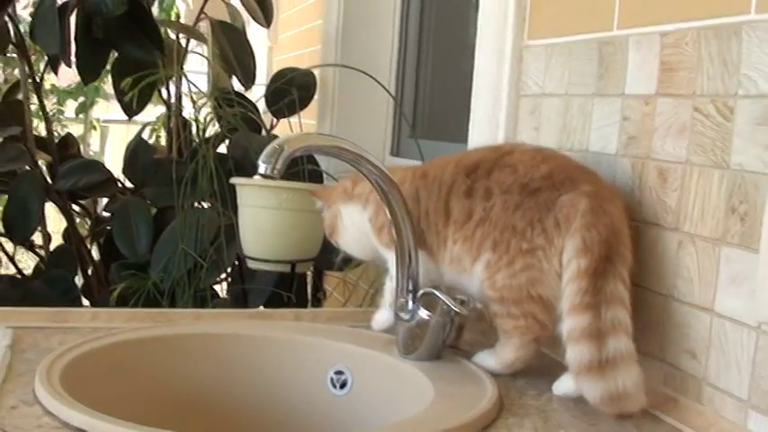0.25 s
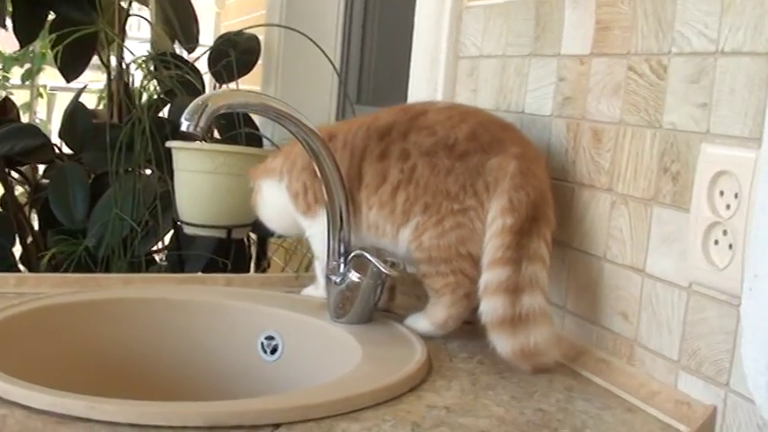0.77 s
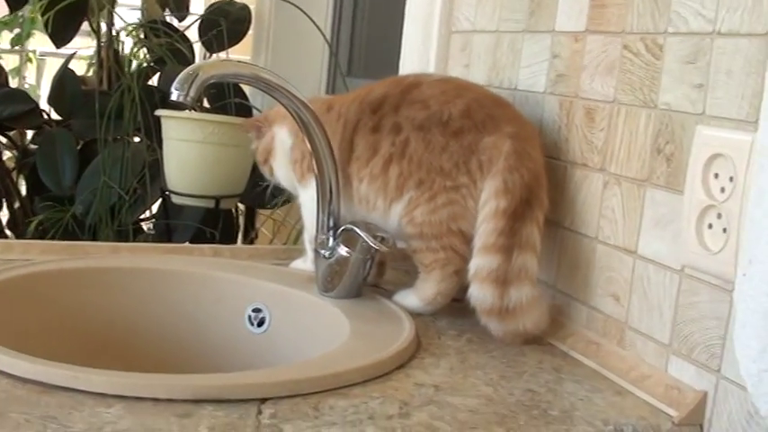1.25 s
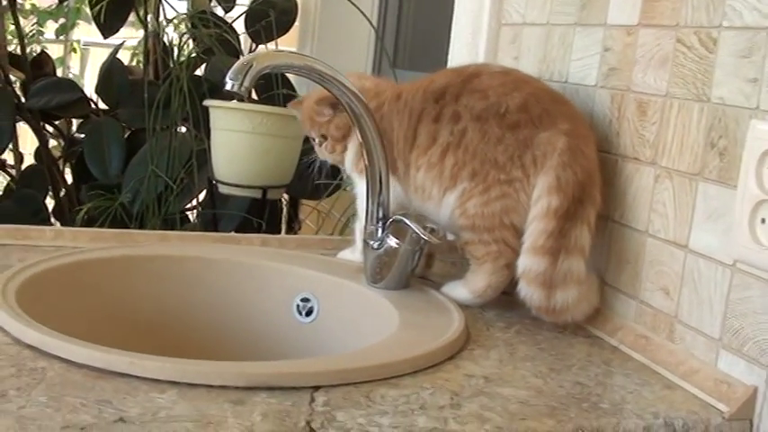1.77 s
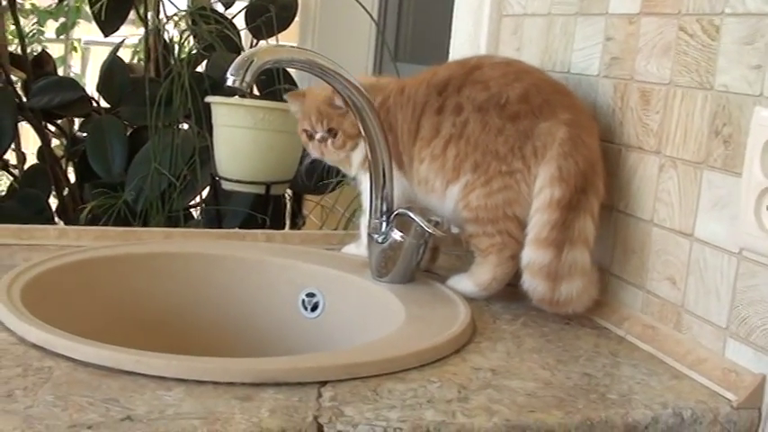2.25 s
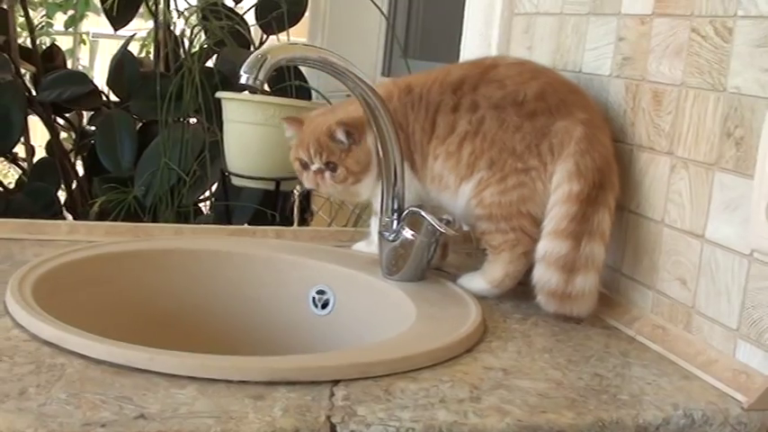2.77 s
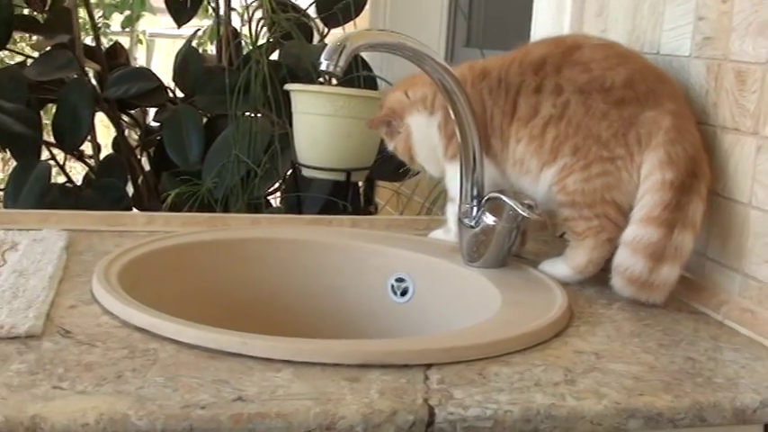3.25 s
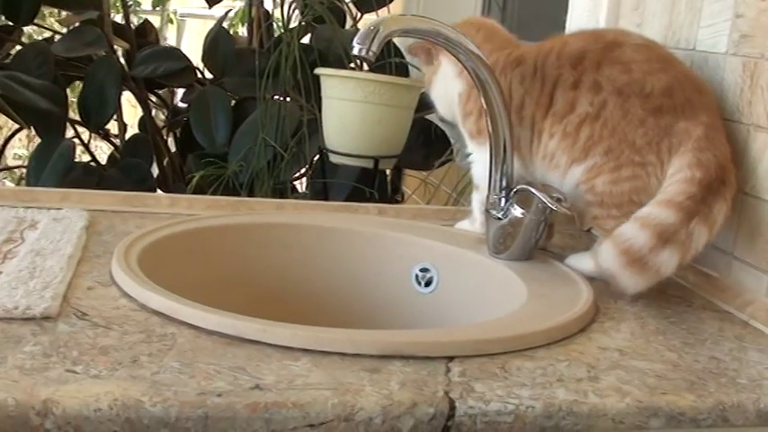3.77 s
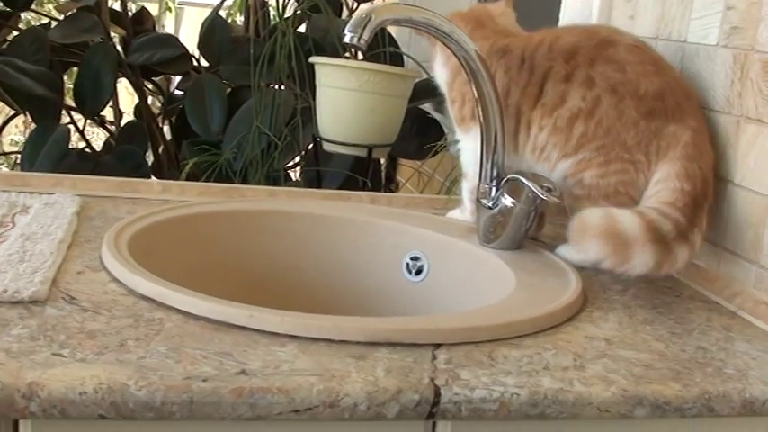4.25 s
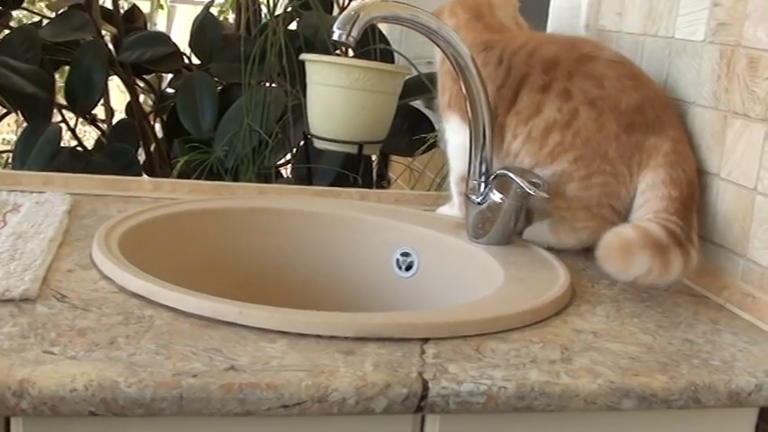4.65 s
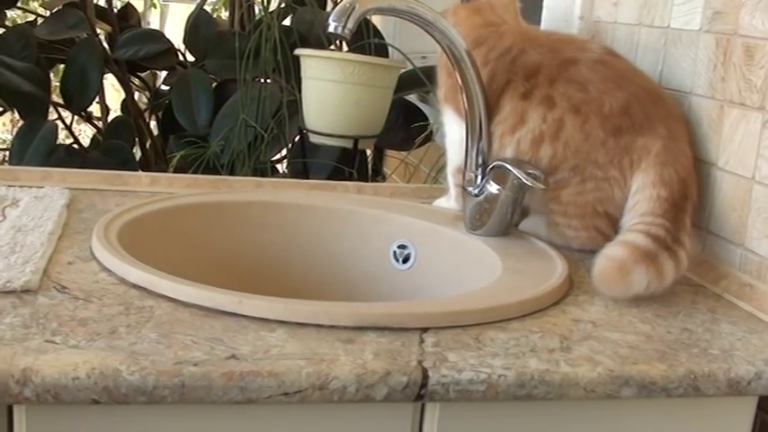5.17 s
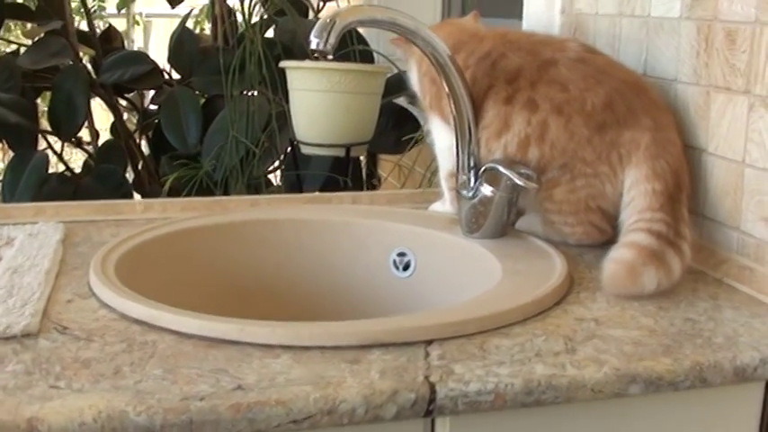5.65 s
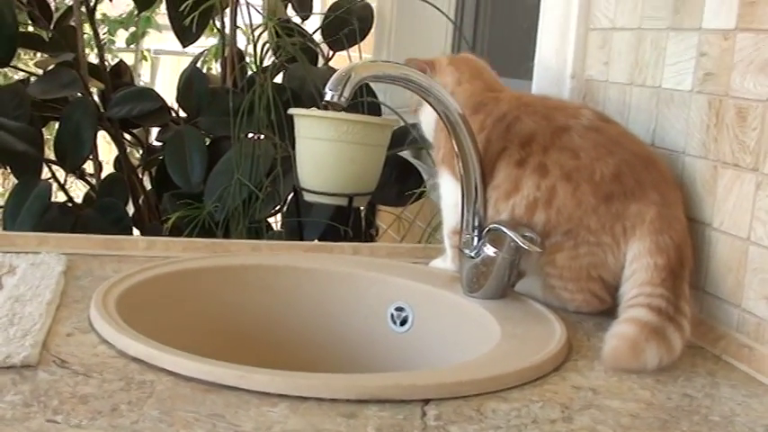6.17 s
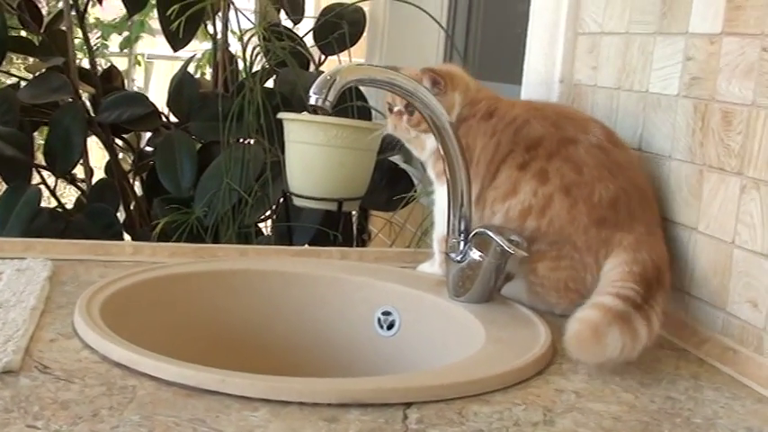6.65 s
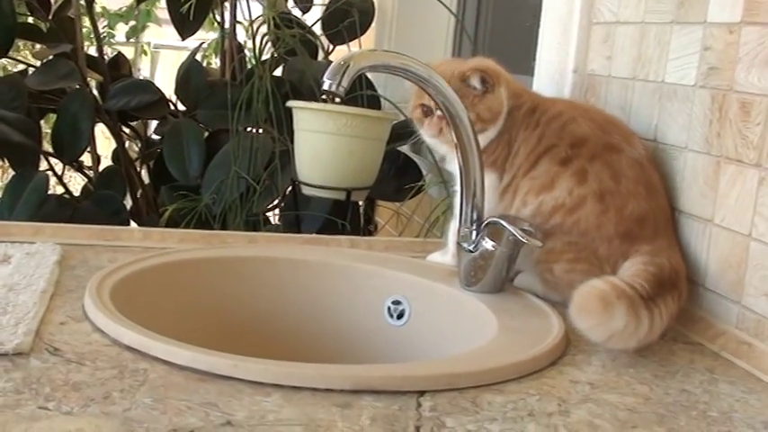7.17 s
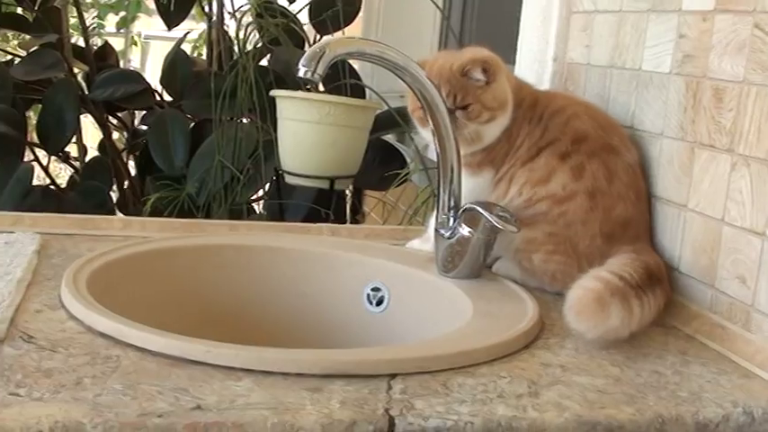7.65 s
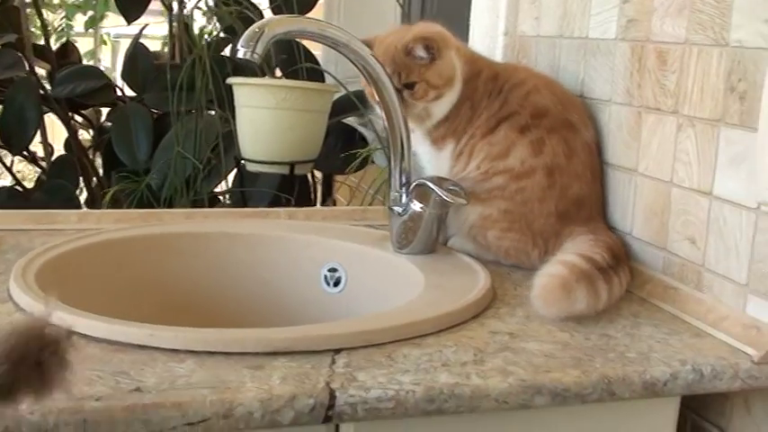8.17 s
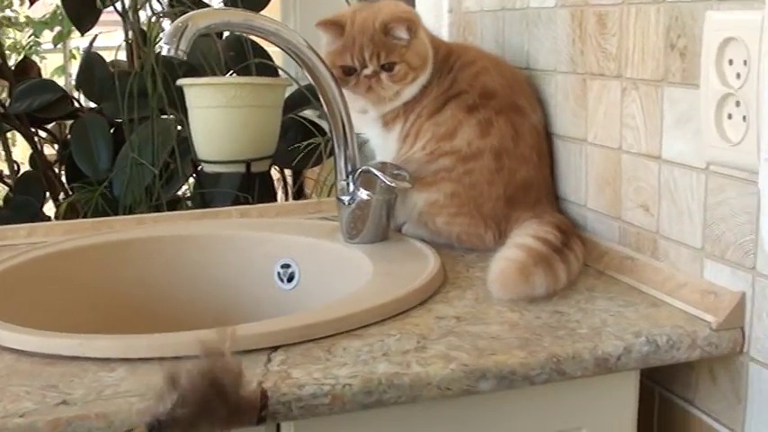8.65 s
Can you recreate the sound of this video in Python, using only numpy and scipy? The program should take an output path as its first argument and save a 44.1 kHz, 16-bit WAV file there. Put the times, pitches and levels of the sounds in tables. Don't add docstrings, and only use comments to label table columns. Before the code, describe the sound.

Close by in a tiled kitchen, a light stick raps a cupboard door in sharp, irregular clusters, each a bright tick with a short rattling reflection and a small thud. Between clusters come quick rubbing scratches and dry ticks. A quieter gap follows, then more raps, stronger scratching and the sharpest clacks at the end. Soft room hum, low rumble and hiss continue beneath.

```python
import sys
import numpy as np
from scipy import signal
from scipy.io import wavfile

SR = 44100
rng = np.random.default_rng(int(sys.argv[2]) if len(sys.argv) > 2 else 0)


def voltage_ratio(level):
    return 10 ** (np.asarray(level, float) / 20)


def generate_wav(signal):
    frames = np.transpose(np.atleast_2d(signal))
    scaled = np.clip(frames, -1, 1) * 32767
    pcm = np.round(scaled).astype(np.int16)
    wavfile.write(sys.argv[1], SR, pcm)


N = 392931
TIME = np.arange(N) / SR
AGE = np.arange(SR // 2) / SR

# [f/Hz, level/dB per Hz]
ROOM_SPECTRUM = [(15, -64), (25, -15.5), (64, -2), (108, -11.5), (200, -12.5), (249, -8), (285, -10.5),
                 (416, -10), (641, -12.5), (734, -10.5), (1840, -21.5), (2350, -25), (2990, -25.5),
                 (6740, -28), (16000, -32.5)]
# [f/Hz, likeness 0..1]
LIKENESS = [(60, 1.0), (130, 0.96), (290, 0.81), (640, 0.72), (1410, 0.46), (3100, 0.55), (6820, 0.83),
            (15000, 0.97)]
# [t/s, level/dB]
STREET = [
    (0.0, -52.5),
    (1.96, -50),
    (3.5, -49.5),
    (5.93, -52),
    (7.47, -51),
    (8.14, -48),
    (8.91, -50.5),
]
# [t/s, level/dB]
RUMBLE_SWELLS = [
    (1.91, 4),
    (3.0, 2),
    (4.2, 2),
    (4.74, 3.5),
    (5.61, 3),
    (6.35, 4),
    (6.95, 4),
    (7.77, 5),
    (8.26, 4),
]
# [from t/s, to t/s, f/Hz, width/Hz, level/dB]
WHINES = [
    (0, 4.2, 750, 18, -64),
    (0, 1.4, 5500, 40, -75),
    (5.25, 5.7, 2400, 40, -72),
    (7.6, 8.6, 540, 30, -63),
]
# [t/s, bright peak level/dB, dull peak level/dB, rattle level under the tick/dB, rattle t60/s]
RAPS = [(0.9108, -14.5, -16.5, -16, 0.25), (1.2979, -19, -19.5, -19, 0.16),
        (1.4256, -14.5, -16, -19.5, 0.19), (1.5626, -27.5, -25.5, -15.5, 0.16),
        (1.628, -28, -26, -16.5, .16), (1.7634, -19.5, -20.5, -17, 0.15), (1.8567, -36, -27.5, -18, 0.17),
        (2.7629, -13.5, -16, -19.5, 0.18), (3.0655, -11.5, -13, -21, 0.18), (3.2241, -16.5, -13, -25, 0.2),
        (3.3565, -14.5, -13, -25.5, 0.22), (3.4909, -12.5, -12, -21, 0.22),
        (3.656, -15.5, -10.5, -23.5, .2), (4.3575, -13, -15, -14.5, 0.21),
        (4.4969, -12.5, -15.5, -16, 0.21), (4.611, -21, -18, -20, 0.18), (6.6407, -10.5, -18, -16.5, 0.24),
        (6.7976, -11.5, -17, -21, 0.23), (6.8932, -12, -18, -20.5, 0.21), (6.9829, -13, -17.5, -19, 0.26),
        (8.3466, -11, -17.5, -21.5, 0.27), (8.5017, -7, -15, -22.5, .145), (8.7171, -8.5, -16, -18.5, 0.16),
        (8.8328, -8.5, -16, -22.5, 0.18)]
# [t/s, bright peak level/dB, dull peak level/dB, rattle level under the tick/dB]
GLANCES = [
    (4.8524, -38, -20.5, -18.5),
    (8.591, -33, -28, -15),
]
# [lag t/s, level/dB]
ECHOES = [(.0006, -7), (.0021, -11), (.0047, -8), (.0063, -12)]
# [f/Hz, width/Hz, level/dB]
BRIGHT = [(4240, 1060, -8), (5400, 700, -2.5), (5980, 350, 2.5), (6430, 140, -4), (6426, 160, -2.5),
          (6570, 490, 2.5), (7340, 460, 1), (8160, 600, -2), (9000, 610, 0.5), (9390, 880, -4.5),
          (10170, 890, -8.5)]
# [f/Hz, width/Hz, level/dB]
DULL = [(1670, 68, -7.5), (1903, 76, -3.5), (2505, 340, -7), (2905, 570, -0.5), (3105, 334, 1.5),
        (3493, 214, 3), (3850, 610, 0), (4220, 460, 0), (4780, 290, 1.5), (4994, 320, 0), (5690, 220, -4)]
# [f/Hz, width/Hz, level/dB]
AIR = [(10500, 2600, 19), (15600, 2500, -23)]
# [f/Hz, width/Hz, level/dB]
THUD = [(453, 87, -6.5), (620, 42, -4), (800, 140, -6.5), (1053, 72, -1.5), (1333, 190, -4),
        (2100, 680, -7)]
# [f/Hz, width/Hz, level/dB]
CRACK_BRIGHT = [(7600, 1100, 0), (9500, 1500, -6)]
# [f/Hz, width/Hz, level/dB]
CRACK_DULL = [(2200, 700, -8), (4300, 900, 0)]
# [t/s, peak level/dB]
SOFT_THUDS = [
    (1.084, -36),
    (1.205, -39),
]
# [t/s, peak level/dB, f/Hz, t60/s]
KNOCKS = [
    (4.269, -36, 970, .07),
    (3.53, -43, 205, .2),
    (1.087, -40, 450, .08),
    (1.207, -41, 470, .08),
]
# [middle t/s, bright level/dB, dull level/dB, half-length/s]
STROKES = [(1.976, -51.5, -57, .02), (2.014, -43.5, -44, 0.017), (2.1, -44.5, -44.5, 0.016),
           (2.182, -49, -41.5, 0.018), (2.24, -59, -64, .012), (2.293, -50, -39.5, 0.0044),
           (2.331, -48, -50.5, 0.024), (2.397, -55, -54, 0.0066), (2.442, -50, -50, 0.0086),
           (2.493, -45.5, -41, .017), (2.554, -44, -47, 0.01), (2.586, -47, -46.5, 0.0092),
           (2.646, -46, -44, 0.019), (2.874, -41.5, -43.5, 0.014), (2.96, -57, -55, 0.022),
           (5.923, -59, -65, .015), (7.105, -50, -46, 0.022), (7.224, -50.5, -59.5, 0.034),
           (7.349, -35, -38, 0.017), (7.429, -30, -41.5, 0.015), (7.535, -35.5, -36.5, 0.012),
           (7.598, -33.5, -42.5, 0.013), (7.68, -37.5, -40.5, .014), (7.737, -30, -41.5, 0.0084),
           (7.758, -42, -44.5, 0.014), (7.837, -33, -35.5, 0.016), (7.901, -40, -50, 0.009),
           (7.979, -34, -35, 0.012), (8.004, -50.5, -55, 0.046), (8.115, -42, -41, 0.017)]
# [f/Hz, width/Hz, level/dB]
RUB_BRIGHT = [(6210, 620, -3), (6990, 370, 0), (7660, 740, 0.5), (8740, 510, -0.5), (9350, 1400, -2.5)]
# [f/Hz, width/Hz, level/dB]
RUB_DULL = [(3217, 200, -4), (3405, 35, -6), (3780, 260, -1.5), (4370, 170, -2), (4880, 1000, 0)]
# [f/Hz, width/Hz, level/dB]
RUB_DEEP = [(1656, 360, -3), (1957, 63, -2.5), (2260, 270, -2.5), (2890, 350, -2.5)]
# [t/s, bright peak level/dB, dull peak level/dB]
TICKS = [(2.102, -26, -39), (2.2852, -15, -25.5), (2.4312, -26, -32.5), (2.546, -31, -43),
         (2.5835, -35, -44), (3.9204, -51, -44), (4.009, -43, -42), (4.2735, -48, -43), (4.2865, -48, -39),
         (6.451, -36.5, -50), (7.432, -20, -42), (7.4404, -22, -36), (7.733, -20, -41), (7.7408, -23, -42),
         (8.3745, -10, -21)]

HISS_TOP_HZ = 16250
RUMBLE_DB, RUMBLE_FOLLOWS, RUMBLE_GROWS_DB_PER_S, SWELL_HALF_S = -61.5, 0.26, 0.39, 0.07
PANEL_HZ, PANEL_T60_S, PANEL_LAG_S = 291, 0.086, 0.018
THUD_UNDER_DB, FLAT_BLOW_DB = -2.5, 12.5
FULL_SWING_S, SWING_THUD_DB = 0.5, 2
THUD_LOSS_PER_DB = 0.24
GLANCE_T60_S, GLANCE_THUD_DB = 0.079, -3.5
REGRIP_S, DEEP_FIRM_DB, DEEP_LIGHT_DB = 2.9, -0.5, -5.5


def at_hz(points, hz):
    table = np.array(points)
    return np.interp(np.log(hz), np.log(table[:, 0]), table[:, 1])


def add(track, s, piece):
    start = round(s * SR)
    track[..., start:start + piece.shape[-1]] += piece[..., :N - start]


def body(x, peaks):
    out, click = 0, 0
    unit = np.eye(1, 2000)[0]
    for k, (hz, width, level_db) in enumerate(peaks):
        r = np.exp(-np.pi * width / SR)
        b = (-1) ** k * voltage_ratio(level_db) * (1 - r * r) / 2 * np.array([1, 0, -1])
        a = [1, -2 * r * np.cos(2 * np.pi * hz / SR), r * r]
        out = out + signal.lfilter(b, a, x + 1e-18)
        click = click + signal.lfilter(b, a, unit)
    return out / np.abs(click).max()


def grit(size, spread_db, side_db):
    sizes = voltage_ratio(spread_db * rng.standard_normal(size))
    mid, side = rng.standard_normal((2, size)) * sizes / np.sqrt(np.mean(sizes ** 2))
    return mid + voltage_ratio(side_db) * side * [[1], [-1]]


def top_cut(x):
    return signal.sosfilt(signal.cheby2(16, 60, HISS_TOP_HZ, fs=SR, output="sos"), x)


def room_tone():
    out = 0
    edges = 19 * 2 ** np.arange(0, 10.1, 1 / 3)
    white = rng.standard_normal((2, 2, N + SR))
    street_db = np.interp(TIME, *np.transpose(STREET))
    swell_db = sum(db * np.exp(-.5 * ((TIME - s) / SWELL_HALF_S) ** 2) for s, db in RUMBLE_SWELLS)
    rumble_db = RUMBLE_DB + RUMBLE_GROWS_DB_PER_S * TIME + swell_db
    rumble_db = rumble_db + RUMBLE_FOLLOWS * (street_db - street_db.mean())
    rumble, hum, hiss = voltage_ratio(rumble_db + 28), voltage_ratio(street_db + 21.5), voltage_ratio(-29.5)
    for k, (low, high) in enumerate(zip(edges, edges[1:])):
        band = signal.butter(2, [low, high], "band", fs=SR, output="sos")
        mid, side = signal.sosfilt(band, white[k % 2])[:, SR:]
        hz = np.sqrt(low * high)
        alike = np.clip(at_hz(LIKENESS, hz), 0, 1)
        level = rumble if hz < 110 else hum if hz < 1500 else hiss
        stereo = np.sqrt(1 + alike) * mid + np.sqrt(1 - alike) * side * [[1], [-1]]
        out = out + level * voltage_ratio(at_hz(ROOM_SPECTRUM, hz)) * stereo
    return top_cut(out)


def whines():
    out = 0
    for start, end, hz, width, level_db in WHINES:
        peak = [(hz, width, 0)]
        tone = body(body(rng.standard_normal(N), peak), peak)
        fade = np.interp(TIME, [start - .2, start, end, end + .2], [0, 1, 1, 0])
        out = out + voltage_ratio(level_db) * fade * tone / tone.std()
    return out


def panel_push():
    push = np.hanning(round(2 * PANEL_LAG_S * SR)) * np.ones((2, 1))
    return push * np.sin(2 * np.pi * PANEL_HZ * AGE[:push.shape[1]])


def panel_ring(pushes):
    r = voltage_ratio(-60 / (PANEL_T60_S * SR))
    turn = 2 * np.pi * PANEL_HZ / SR
    return signal.lfilter([0, np.sin(turn)], [1, -2 * r * np.cos(turn), r * r], pushes + 1e-18)


def slap_tick():
    tick = np.zeros((2, len(AGE)))
    tick[:, 0] = 1
    for (lag, echo_db), (jitter, size) in zip(ECHOES, rng.standard_normal((len(ECHOES), 2))):
        tick[:, round(SR * lag * (1 + .06 * jitter))] += voltage_ratio(echo_db + 2 * size) * np.sign(jitter)
    return tick


def raps():
    bright, dull, air, thud, panel, crack_bright, crack_dull = np.zeros((7, 2, N))
    push = panel_push()
    blows = sorted(RAPS + [(*row, GLANCE_T60_S) for row in GLANCES])
    pauses = np.diff(np.array(blows)[:, 0], prepend=0)
    for pause, (s, bright_db, dull_db, rattle_db, t60) in zip(pauses, blows):
        crisp_db = bright_db - dull_db
        thud_db = dull_db + rattle_db + THUD_UNDER_DB - THUD_LOSS_PER_DB * crisp_db
        thud_db += FLAT_BLOW_DB * (s == RAPS[0][0])
        thud_db += SWING_THUD_DB * (pause > FULL_SWING_S)
        thud_db += GLANCE_THUD_DB * (t60 == GLANCE_T60_S)
        s = s + .0006
        fade = voltage_ratio(-60 * AGE / np.clip(t60, .05, .5)) + voltage_ratio(-26 - 60 * AGE / .6)
        early = voltage_ratio(-60 * AGE / .06)
        build = voltage_ratio(rattle_db - 2) * (1 - np.exp(-AGE / .001))
        tick = slap_tick()
        fine, coarse, low = (grit(len(AGE), 3.0, side_db) for side_db in (-16, -12, -14))
        add(crack_bright, s, voltage_ratio(bright_db + 4.5) * tick * voltage_ratio([[.7], [-.7]]))
        add(crack_dull, s, voltage_ratio(dull_db - 3.5) * tick * voltage_ratio([[1.5], [-1.5]]))
        add(bright, s, voltage_ratio(bright_db) * build * (voltage_ratio(-0.05) * fade + voltage_ratio(-13.5) * early) * fine)
        add(dull, s, voltage_ratio(dull_db - 6.5) * (voltage_ratio(4.0) * tick + build * (fade + early) * coarse))
        air_db = bright_db + 1.84 * crisp_db - 20
        add(air, s, voltage_ratio(air_db) * build * fade * voltage_ratio(-60 * AGE / .5) * fine)
        thud_shape = (1 - np.exp(-AGE / 0.00077)) * voltage_ratio(-60 * AGE / 0.21)
        add(thud, s, voltage_ratio(thud_db - 16.8) * thud_shape * low)
        add(panel, s, voltage_ratio(min(thud_db, -28) - 52.5) * push)
    cracks = body(crack_bright, CRACK_BRIGHT) + body(crack_dull, CRACK_DULL)
    rattle = body(bright, BRIGHT) + body(dull, DULL) + body(air, AIR)
    return cracks + top_cut(rattle + body(thud, THUD) + panel_ring(panel))


def soft_thuds():
    thud, panel = np.zeros((2, 2, N))
    soften = signal.butter(4, 750, fs=SR, output="sos")
    for s, thud_db in SOFT_THUDS:
        swell = (1 - np.exp(-AGE / 0.0026)) * voltage_ratio(-60 * AGE / 0.13) * grit(len(AGE), 4.8, side_db=-7)
        add(thud, s, voltage_ratio(thud_db - 11.5) * signal.sosfilt(soften, swell))
        add(panel, s, voltage_ratio(thud_db - 52.5) * panel_push())
    return top_cut(body(thud, THUD) + panel_ring(panel))


def knocks():
    out = 0
    for s, peak_db, hz, t60 in KNOCKS:
        age = np.maximum(TIME - s, 0)
        shape = voltage_ratio(peak_db - 60 * age / t60) * (1 - np.exp(-age * hz / 2))
        out = out + shape * np.sin(2 * np.pi * hz * age)
    return out


def rubbing():
    out = 0
    r = voltage_ratio(-60 / (.2 * SR))
    catch_db = 1.6 * rng.standard_normal((len(STROKES), 3, 5))
    middle, bright_db, dull_db, half = np.transpose(STROKES)
    deep_db = dull_db + np.where(middle < REGRIP_S, DEEP_FIRM_DB, DEEP_LIGHT_DB)
    groups = (bright_db, RUB_BRIGHT, -14), (dull_db, RUB_DULL, -9), (deep_db, RUB_DEEP, -13)
    for column, (level, peaks, side_db) in enumerate(groups):
        grains = grit(N, 6.5, side_db)
        for k, (hz, width, peak_db) in enumerate(peaks):
            push = np.zeros(N)
            for s, half_s, stroke_db in zip(middle, half, level + catch_db[:, column, k]):
                bell = np.exp(-.5 * ((TIME[:SR // 5] - .1) / half_s) ** 2)
                add(push, s - .1, voltage_ratio(stroke_db) * bell)
            push = push + voltage_ratio(-10.5) * signal.lfilter([1 - r], [1, -r], push)
            rung = body(grains, [(hz, width, 0)])
            out = out + (-1) ** k * voltage_ratio(peak_db - 5.5) * push * rung / rung.std()
    tip = signal.butter(8, [1000, 10600], "band", fs=SR, output="sos")
    return signal.sosfilt(tip, out) * voltage_ratio([[1.1], [-1.1]])


def dry_ticks():
    crack_bright, crack_dull = np.zeros((2, 2, N))
    for s, bright_db, dull_db in TICKS:
        tail = voltage_ratio(-29.5 - 60 * AGE / 0.046) * grit(len(AGE), 6, side_db=-5)
        snap = np.eye(1, len(AGE)) + tail
        add(crack_bright, s, voltage_ratio(bright_db) * snap)
        add(crack_dull, s, voltage_ratio(dull_db + 3) * snap)
    return body(crack_bright, CRACK_BRIGHT) + body(crack_dull, CRACK_DULL)


def scene():
    background = room_tone() + whines()
    contacts = raps() + soft_thuds() + dry_ticks()
    return background + contacts * voltage_ratio([[.6], [-.6]]) + knocks() + rubbing()


def roll_off(x):
    return signal.sosfilt(signal.butter(12, 17080, fs=SR, output="sos"), x)


def record(dry):
    rounded = .9 * np.tanh(dry / .9)
    mix = signal.sosfilt(signal.cheby2(10, 60, 17500, fs=SR, output="sos"), rounded)
    return roll_off(mix)


dry = scene()
out = record(dry)
generate_wav(out)
```